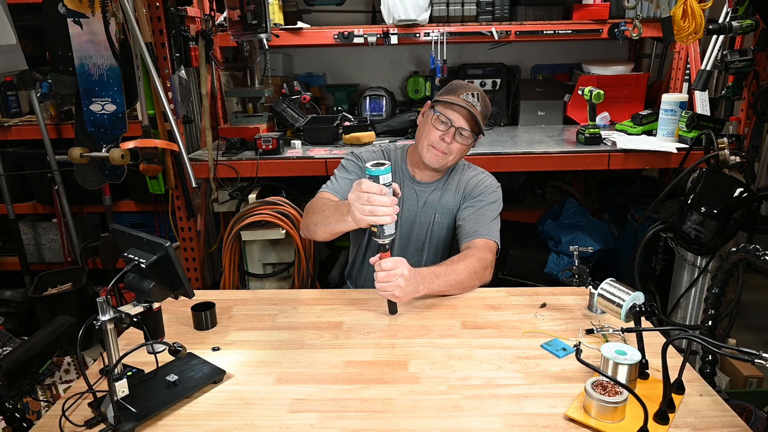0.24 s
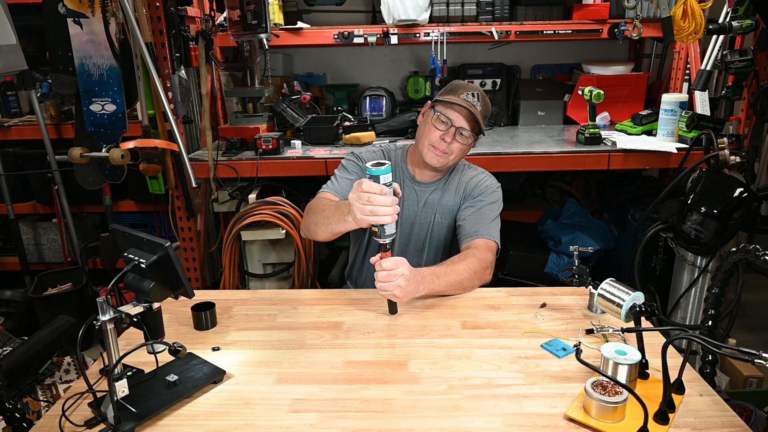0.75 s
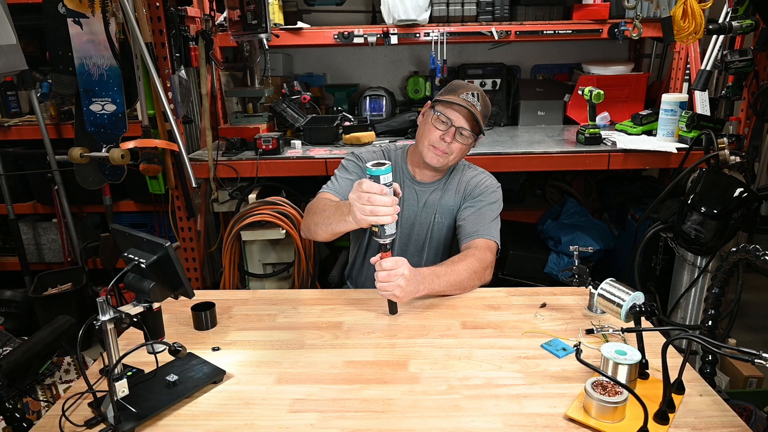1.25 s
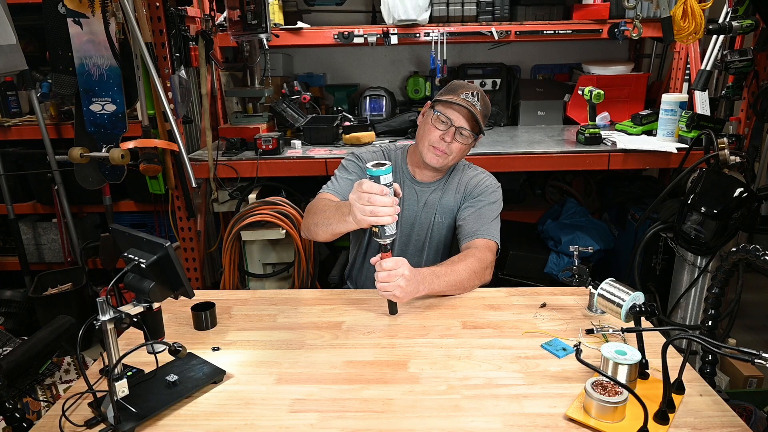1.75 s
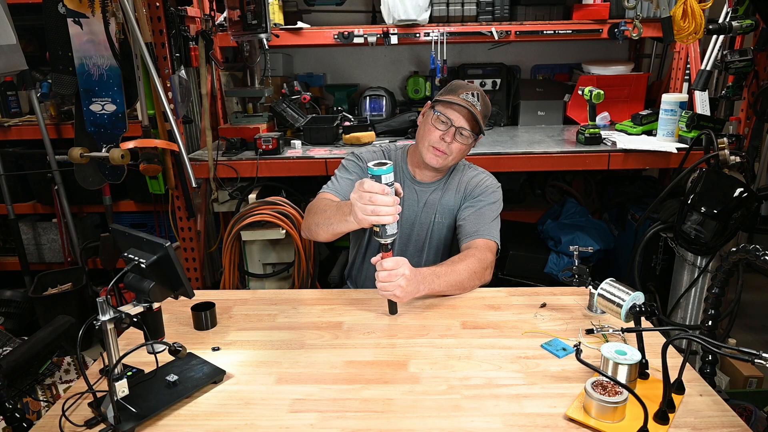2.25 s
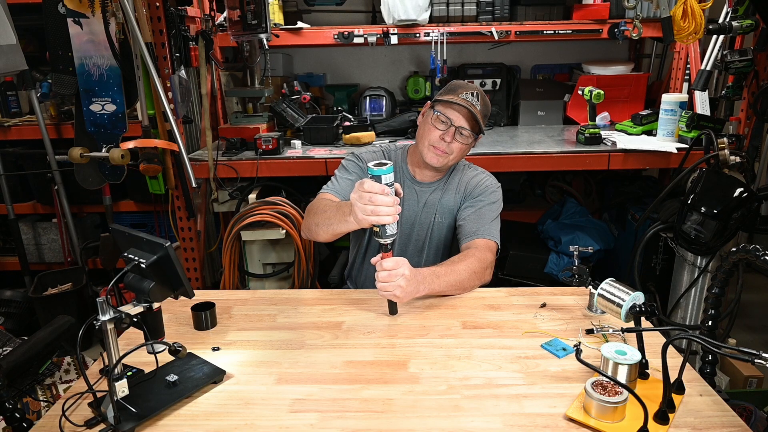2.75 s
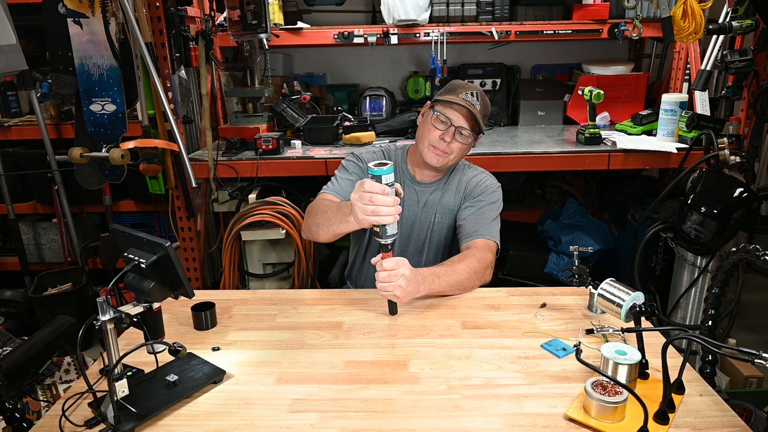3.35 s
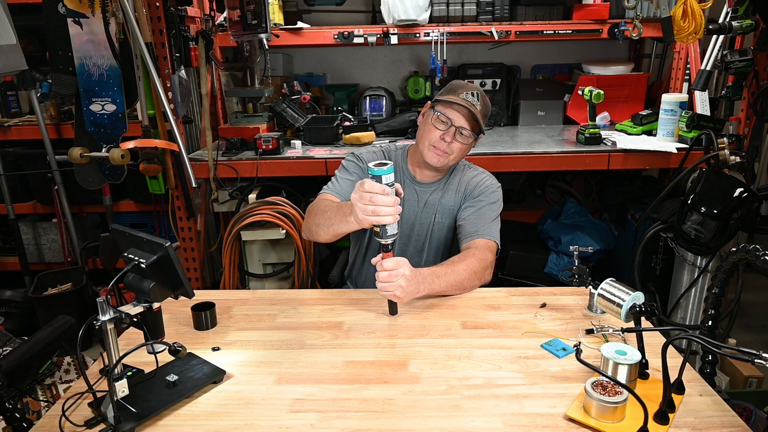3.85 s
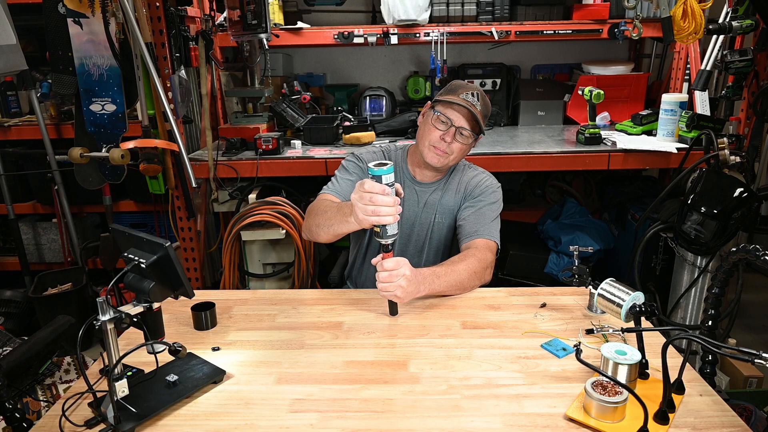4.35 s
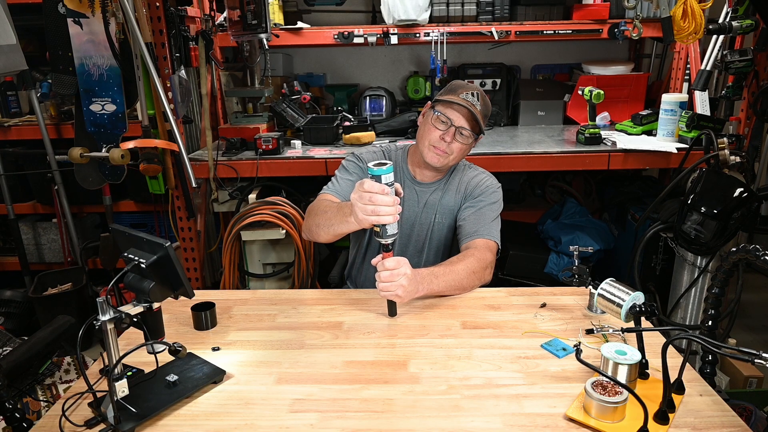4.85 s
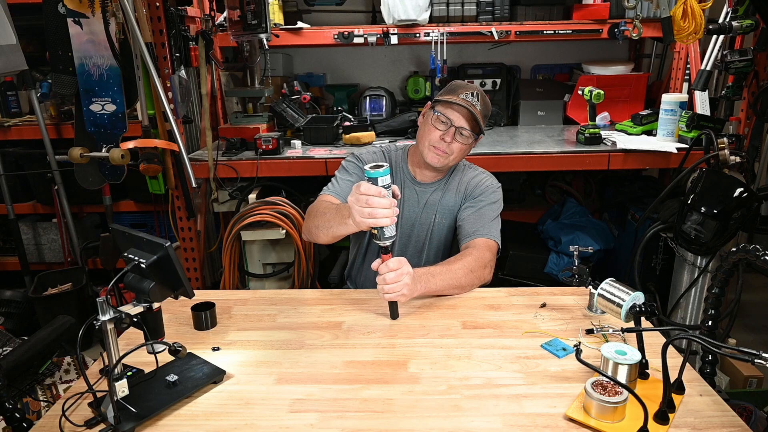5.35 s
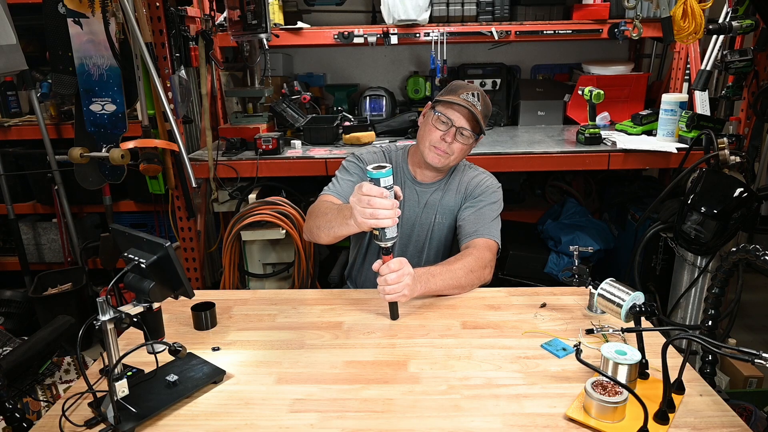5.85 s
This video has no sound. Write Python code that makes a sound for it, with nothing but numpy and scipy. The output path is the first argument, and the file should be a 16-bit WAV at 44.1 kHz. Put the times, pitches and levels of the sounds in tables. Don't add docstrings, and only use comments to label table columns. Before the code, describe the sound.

In a workshop, a light fluttering gas leak with tiny clicks jumps at three seconds to a strong bright hiss, with dull can knocks later.

```python
import sys
import numpy as np
from scipy import signal
from scipy.fft import rfft, irfft, next_fast_len
from scipy.io import wavfile

SR = 44100
rng = np.random.default_rng(int(sys.argv[2]) if len(sys.argv) > 2 else 0)


def generate_wav(signal):
    frames = np.transpose(np.atleast_2d(signal))
    scaled = np.clip(frames, -1, 1) * 32767
    pcm = np.round(scaled).astype(np.int16)
    wavfile.write(sys.argv[1], SR, pcm)


def gain_from_db(level_db):
    decades = np.asarray(level_db, float) / 20
    return 10 ** decades


N = 269010
PRESS_S = 3.0


def rms_one(x):
    return x / np.sqrt(np.mean(x ** 2) + 1e-20)


def in_time(rows):
    seconds, *columns = np.transpose(rows)
    return [np.interp(np.arange(N) / SR, seconds, column) for column in columns]


def at_hz(points, hz, axis=1):
    points = np.array(points)
    return np.interp(np.log(hz + 1), np.log(points[:, 0]), points[:, axis])


def resonate(x, hz, width, rate=SR):
    r = np.exp(-np.pi * width / rate)
    return signal.lfilter([1, 0, -1], [1, -2 * r * np.cos(2 * np.pi * hz / rate), r * r], x)


def wobble(hz, width):
    slow = resonate(rng.standard_normal(N // 40 + 1002), hz, width, rate=SR / 40)[1000:]
    return np.interp(np.arange(N) / 40, np.arange(len(slow)), rms_one(slow))


def background():
    # frequency in Hz, density in dB per Hz.
    air_spectrum = [(15, -63), (25, -20), (112, -8), (270, -6.5), (520, -4.5), (3000, -8), (3900, -35),
                    (6600, -120)]
    # frequency in Hz, left-right likeness from 0 to 1.
    likeness = [(30, .68), (70, 0.79), (140, 0.45), (1000, 0.42)]
    # mains harmonic in Hz, level in dB rms.
    hum_lines = [(297.5, -76.5), (357, -79.5), (416, -88), (476, -83), (595, -82)]
    air_db = -65
    hz = np.arange(N // 2 + 1) * SR / N
    alike = np.clip(at_hz(likeness, hz), 0, .99)
    shares = np.array([np.ones_like(hz), np.sqrt((1 - alike) / (1 + alike))])
    noise = rfft(rng.standard_normal((2, N)))
    mid, side = irfft(noise * gain_from_db(at_hz(air_spectrum, hz)) * shares, N)
    air = gain_from_db(air_db) / np.std(mid) * np.array([mid + side, mid - side])
    t = np.arange(N) / SR
    hum = 0
    for line_hz, db in hum_lines:
        level = gain_from_db(db + 3 + 0.58 * wobble(4.0, 5.2))
        hum = hum + level * np.sin(2 * np.pi * (line_hz * t + rng.random()))
    return air + hum * gain_from_db(np.array([[1.2], [-1.2]]))


def knocks(events, modes, trim_db, rebound_s, rebound_db, low_hz):
    events, out = np.array(events), np.zeros(N)
    starts = (events[:, 0] * SR).astype(int)
    spread_db = rng.normal(0, 2.0, (len(events), len(modes)))
    signs = (-1) ** np.arange(len(modes))
    for (hz, level_db, t60), own_db, sign in zip(modes, spread_db.T, signs):
        clicks = np.full(N, 1e-18)
        clicks[starts] = sign * gain_from_db(events[:, 1] + level_db + trim_db + own_db)
        r, w = gain_from_db(-60 / (t60 * SR)), 2 * np.pi * hz / SR
        out += signal.lfilter([0, np.sin(w)], [1, -2 * r * np.cos(w), r * r], clicks)
    out = out + gain_from_db(rebound_db) * np.roll(out, round(rebound_s * SR))
    return signal.sosfilt(signal.butter(2, low_hz, "high", fs=SR, output="sos"), out)


def valve_ticks():
    # start in seconds, peak in dB.
    ticks = [(0.458, -31), (0.8636, -31.5), (1.3688, -29), (1.4152, -46), (1.5483, -45), (1.676, -34),
             (1.8802, -39), (2.143, -30.5), (2.5455, -42)]
    # mode in Hz, level in dB, 60 dB decay time in seconds.
    stem = [(1350, -12, .006), (1800, -7, .007), (2500, -5, .011), (2850, -5, .009), (3250, -8, .006)]
    return knocks(ticks, stem, trim_db=0.5, rebound_s=.003, rebound_db=-11, low_hz=900)


def can_gulps():
    # start in seconds, peak in dB.
    gulps = [(4.577, -43), (4.631, -46), (5.09, -39.5), (5.236, -25.5), (5.379, -41), (5.398, -35),
             (5.584, -48), (5.61, -33), (5.626, -26), (5.657, -29.5), (5.681, -32), (5.723, -40),
             (5.768, -23.5), (5.873, -28), (6.036, -42), (6.053, -33), (6.082, -42)]
    # mode in Hz, level in dB, 60 dB decay time in seconds.
    can = [(300, -24, .015), (520, -21, 0.014), (960, -7, .014), (1230, -10, 0.009), (1480, -9, 0.006),
           (1780, -9, 0.006)]
    return knocks(gulps, can, trim_db=1.5, rebound_s=.0021, rebound_db=-8, low_hz=180)


def slipping():
    # start in seconds, length in seconds, strength (negative seals tighter).
    slips = [
        (2.525, .02, -.45),
        (2.984, .03, 0.8),
        (4.806, 0.12, 0.5),
        (4.81, 0.023, 0.65),
        (4.905, 0.021, 0.4),
        (5.105, .03, 0.85),
        (5.164, 0.028, 0.7),
    ]
    edge = .015
    t = np.arange(N) / SR
    slip = 0
    for start, length, strength in slips:
        corners = [start, start + edge, start + length, start + length + edge]
        slip = slip + strength * np.interp(t, corners, [0, 1, 1, 0])
    return slip


def region(modes, seat, flicker_db):
    out, power = 0, 0
    for hz, width, *seat_db in modes:
        gain = gain_from_db(np.interp(seat, np.arange(3), seat_db))
        once = resonate(rng.standard_normal(N), hz, 1.78 * width)
        band = resonate(once, hz, 1.78 * width)
        out = out + gain * gain_from_db(flicker_db * wobble(3.3, 32.0)) * rms_one(band)
        power = power + gain ** 2
    return out / np.sqrt(power)


def slide_notch(x, slip, width):
    from_hz, to_hz, settle_delay_s, settle_s = 6850, 5900, .17, .22
    light_depth, hard_depth = .3, .96
    fills = (.5, 1.0)
    since = np.arange(N) / SR - PRESS_S
    hz = to_hz + (from_hz - to_hz) * np.exp(-np.maximum(since - settle_delay_s, 0) / settle_s)
    depth = np.where(since < 0, light_depth, hard_depth) * np.interp(slip, fills, [1, 0])
    hz = hz + 90 * wobble(3.0, 12.0)
    depth = depth * np.clip(.97 + .07 * wobble(5.0, 15.0), 0, 1)
    band, state = np.zeros(N), np.zeros(2)
    for i in range(0, N, 256):
        b, a = signal.iirpeak(hz[i], hz[i] / width, SR)
        band[i:i + 256], state = signal.lfilter(b, a, x[i:i + 256], zi=state)
    return x - depth * band


def sputtering():
    light_db, hard_db = 5.0, 1.2
    times = [0, .6, 1.9, PRESS_S, PRESS_S + .5]
    depth_db = np.interp(np.arange(N) / SR, times, [0.53 * light_db, light_db, light_db, 0, hard_db])
    turns = np.cumsum(24.0 + 2.5 * wobble(2.5, 6.0)) / SR
    return depth_db * (1.15 + .3 * wobble(2.5, 5.0)) * np.sin(2 * np.pi * turns)


def jet():
    # resonance in Hz, width in Hz, then its level in dB for light, hard and tilted seat.
    body = [(1054, 81, -21, -22.5, -15), (1690, 620, -10.5, -6.5, -6), (2095, 510, -30, -12.5, -14),
            (2717, 1350, -5.5, -6, -3.5), (3253, 910, -6.5, 0.8, 0.5), (3800, 570, -9, -3.5, -9),
            (4534, 283, -1.4, -5, .8)]
    valley = [(5335, 540, 3, -0.5, -2), (6200, 700, -26, 7, -10), (6730, 750, -5.5, 2, -4),
              (7630, 480, -1.5, -3, 0.5)]
    whistle = [(8350, 270, -13, -5, -15.5), (8936, 283, -2, -0.4, -4), (9510, 240, -1.5, -11.5, 7),
               (9550, 570, -29, 0, -2.5), (10256, 256, 3, -4.5, -7), (10850, 170, -4.5, -12, -13)]
    top = [(11150, 210, -21, -5, 1.5), (11670, 270, 2.5, -1.5, -2), (12350, 320, -2, -4, -1),
           (13600, 720, -1.5, -5.5, -4), (14400, 450, -15, 2, -8), (15500, 450, -13.5, -15, -12),
           (15550, 400, -20, -15, -14)]
    # time in seconds, flow in dB, seat (0 light, 1 hard, 2 tilted), pinch of the gap in dB.
    hand = [(0, -53.5, 0.081, 6), (.5, -53, 0.077, -0.5), (1.4, -52, 0.073, 0.5), (2.2, -53.5, 0, 1.5),
            (2.5, -55, 0, 5.5), (2.7, -59, 0.084, 7), (2.975, -61, 0.044, 7.5), (3.02, -47, 0.048, 7.5),
            (3.2, -46, 0.27, 3.5), (3.55, -46, 0.65, 2), (4.2, -44.5, 0.88, -1.5), (4.45, -45.5, 0.76, 1.5),
            (4.65, -44.5, .95, -2), (4.79, -44.5, 0.87, -1.5), (4.95, -45, 1.6, -3), (5.3, -44.5, 1.85, -3),
            (5.55, -44, 1.45, 0), (6.1, -45, 1.56, 1.5)]
    # level over the flow in dB for light, hard and tilted seat.
    over_flow_db = [(-7, -7.5, -7.5), (5.5, 6.5, 8), (-0.5, -0.1, 0.8)]
    # dB per dB of pinch for light, hard and tilted seat.
    pinch_share = [(-0.23, -.2, -0.63), (-0.65, 1.12, 1.1), (0.97, 1.1, 1.01)]
    # share of the sputter, and change in dB at a full slip.
    sputter_share = [0.25, 0.12, 0.16, 0.8]
    slip_change_db = [0.9, 2, -8, -7.5]
    # cancellation by the bench echo in Hz, width in Hz, depth from 0 to 1.
    notches = [(2270, 200, .8), (5050, 300, .5), (14150, 350, .6)]
    seep_db = -63.5

    flow_db, seat, pinch_db = in_time(hand)
    slip = slipping()
    above_db = []
    for seat_db, seat_share in zip(over_flow_db, pinch_share):
        level_db = np.interp(seat, np.arange(3), seat_db)
        above_db.append(level_db + pinch_db * np.interp(seat, np.arange(3), seat_share))
    above_db[0] = 10 * np.log10(gain_from_db(2 * above_db[0]) + gain_from_db(2 * (seep_db - flow_db)))
    sputter = sputtering()
    rough_db = 1.05 * wobble(40.0, 100.0)
    regions = zip([body, valley, whistle, top], [0] + above_db, sputter_share, slip_change_db)
    out = 0
    for modes, rel_db, share, slip_db in regions:
        level_db = flow_db + rel_db + slip_db * slip + share * sputter + rough_db
        out = out + gain_from_db(level_db) * region(modes, seat, flicker_db=1.15)
    for hz, width, depth in notches:
        b, a = signal.iirpeak(hz, hz / width, SR)
        out = out - np.clip(depth, 0, 1) * signal.lfilter(b, a, out)
    return slide_notch(out, slip, width=750)


def shop(x):
    # delay of a bench or shelf echo in seconds, level in dB.
    echoes = [(.0042, -12), (.0088, -15), (.0143, -17), (.0182, -13)]
    # frequency in Hz, left-right level in dB, left lead in radians, diffuse side level in dB.
    ports = [(300, 0, 0.29, -11), (1300, 0.5, 0, -31), (2030, 0, 0, -24), (3520, -0.5, 0, -14),
             (4030, 1, 0.05, -8.5), (5070, 2, 0.52, -13.5), (6900, 2, 0.6, -14), (7900, 6, 0.48, -11.5),
             (10400, 1.5, 0.26, -7), (11400, 5, 0.35, -8), (12000, -2, .6, -15), (13100, -0.5, 0.6, -7),
             (15500, 5, 0.66, -29)]
    t60_s, tail_db = .2, -11
    size = next_fast_len(N + SR // 2)
    hz, t = np.arange(size // 2 + 1) * SR / size, np.arange(SR // 3) / SR
    tails = rng.standard_normal((2, len(t))) * gain_from_db(-60 * t / t60_s) * (t > .003)
    shared, differing = rfft(tails / np.linalg.norm(tails, axis=1, keepdims=True), size)
    near = 1 + gain_from_db(tail_db) * shared
    for delay_s, db in echoes:
        near = near + gain_from_db(db) * np.exp(-2j * np.pi * hz * delay_s)
    near /= np.sqrt(np.mean(abs(near) ** 2))
    skew = gain_from_db(at_hz(ports, hz) / 2) * np.exp(.5j * at_hz(ports, hz, axis=2))
    side = gain_from_db(at_hz(ports, hz, axis=3)) * differing
    paths = np.array([near * skew + side, near / skew - side])
    return irfft(rfft(x, size) * paths, size)[:, :N]


def scene():
    return background() + shop(valve_ticks() + can_gulps() + jet())


def roll_off(x):
    return signal.sosfilt(signal.butter(12, 16050, fs=SR, output="sos"), x)


def record(dry):
    low_pass = signal.ellip(10, .3, 60, 15700, fs=SR, output="sos")
    mix = signal.sosfilt(low_pass, dry)
    return roll_off(mix)


dry = scene()
out = record(dry)
generate_wav(out)
```